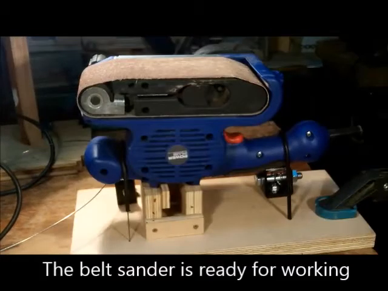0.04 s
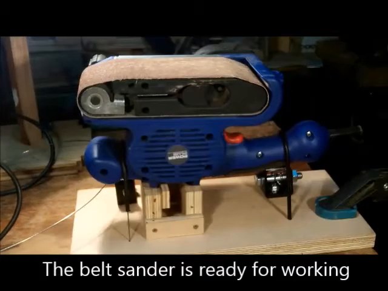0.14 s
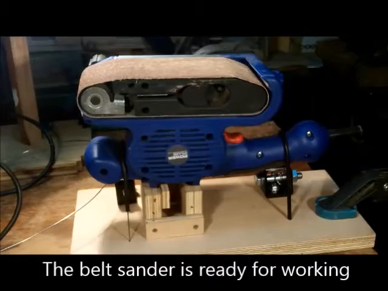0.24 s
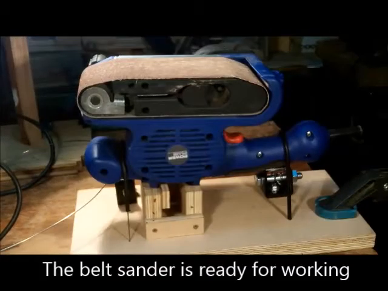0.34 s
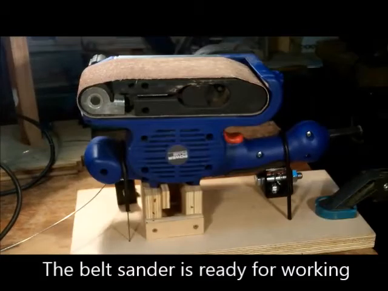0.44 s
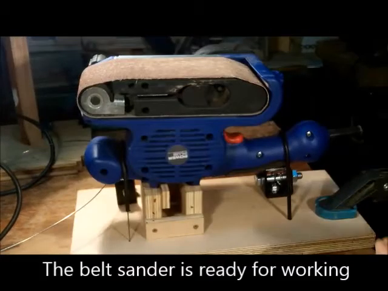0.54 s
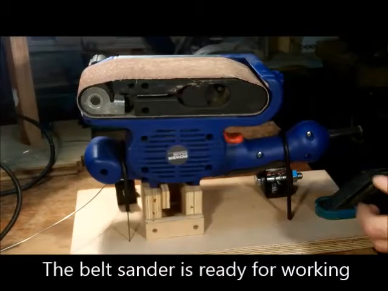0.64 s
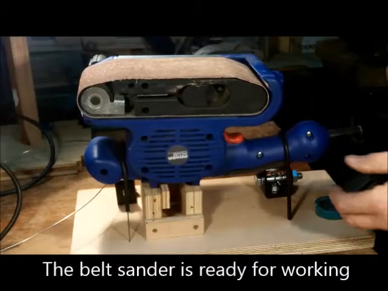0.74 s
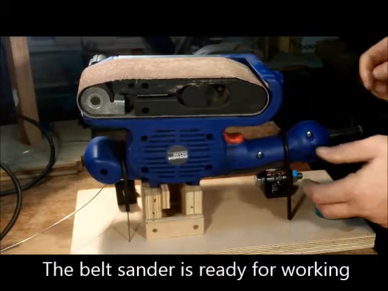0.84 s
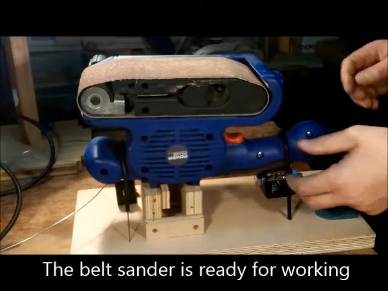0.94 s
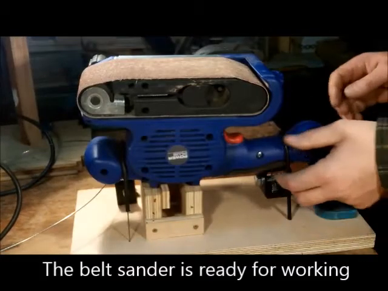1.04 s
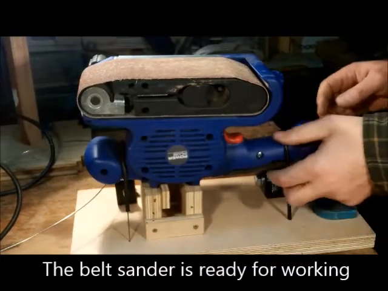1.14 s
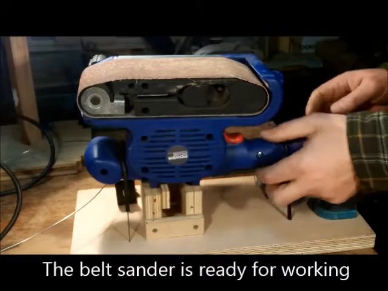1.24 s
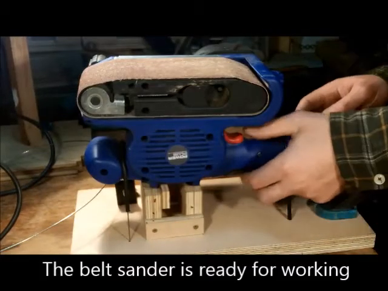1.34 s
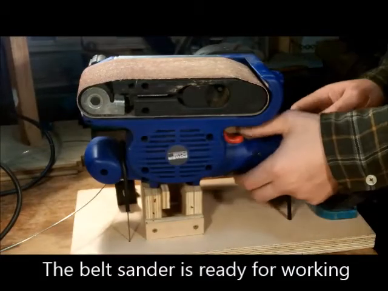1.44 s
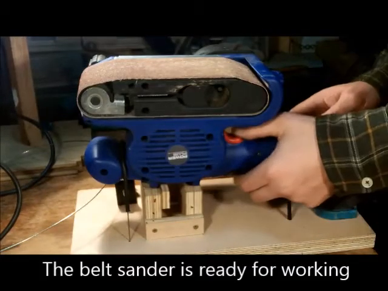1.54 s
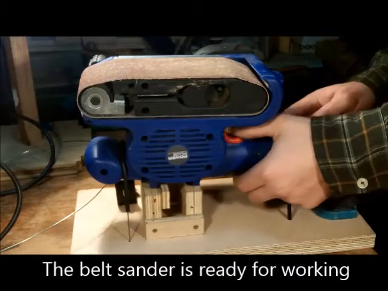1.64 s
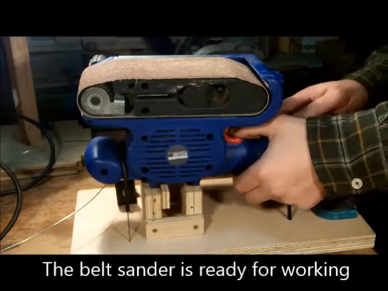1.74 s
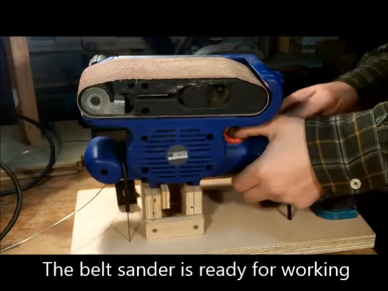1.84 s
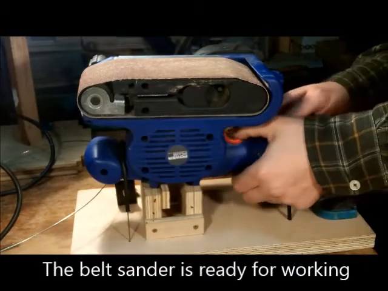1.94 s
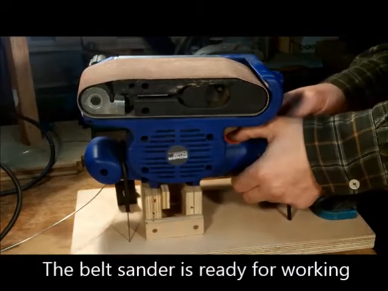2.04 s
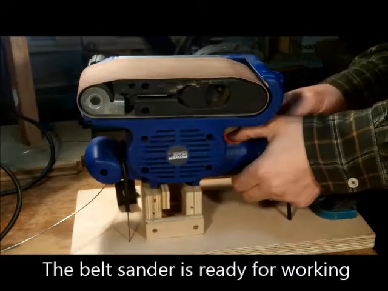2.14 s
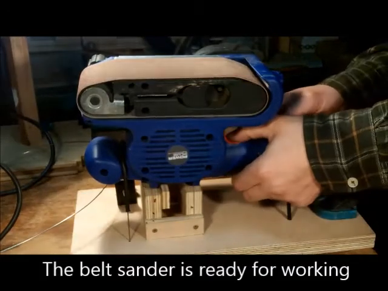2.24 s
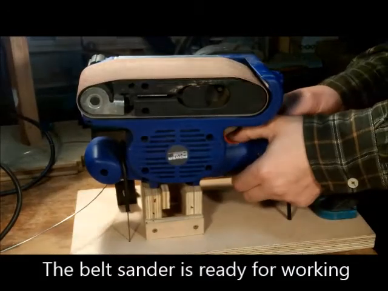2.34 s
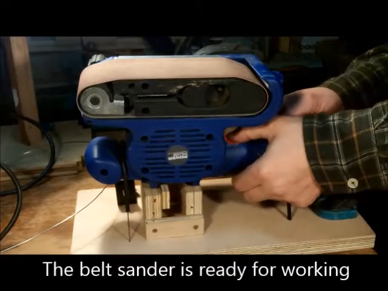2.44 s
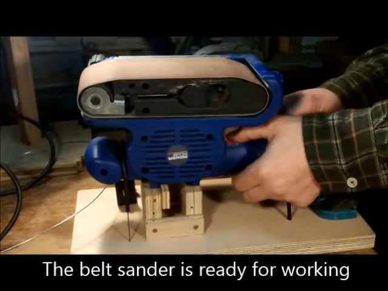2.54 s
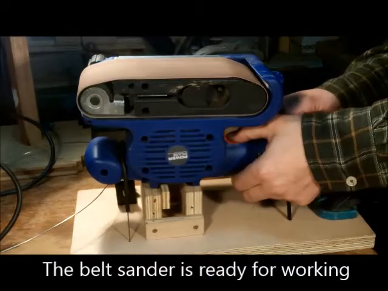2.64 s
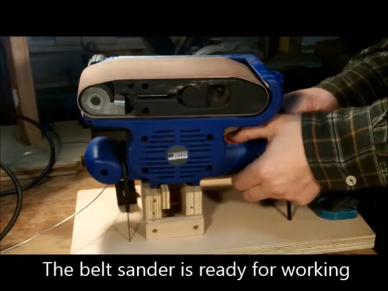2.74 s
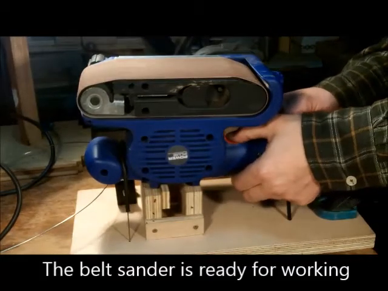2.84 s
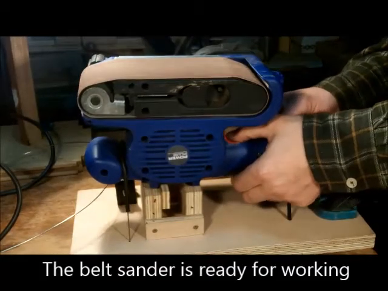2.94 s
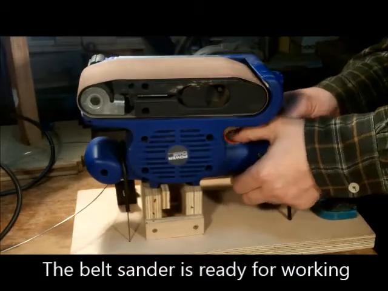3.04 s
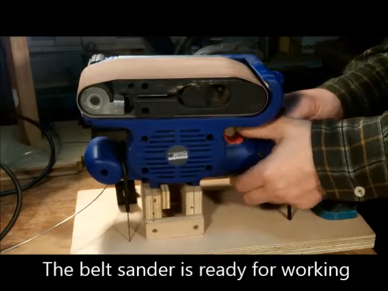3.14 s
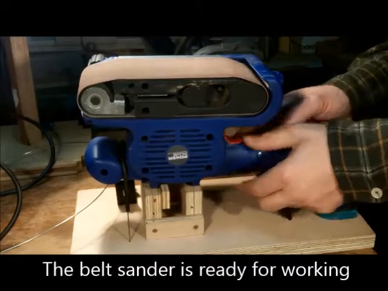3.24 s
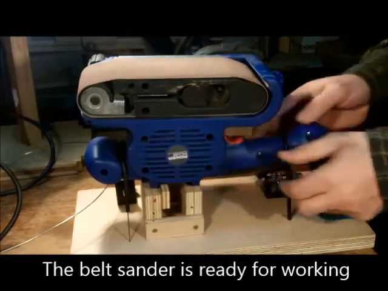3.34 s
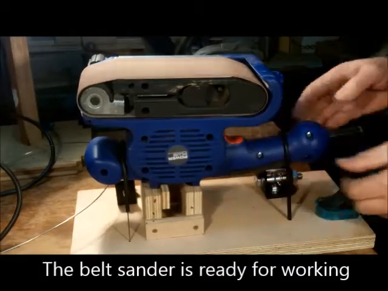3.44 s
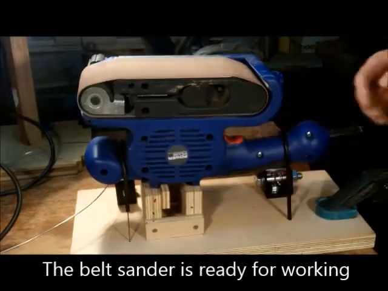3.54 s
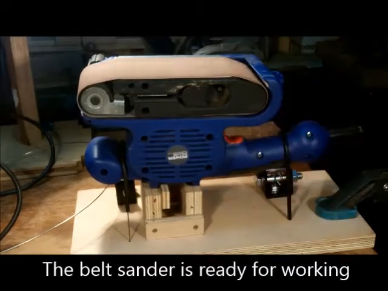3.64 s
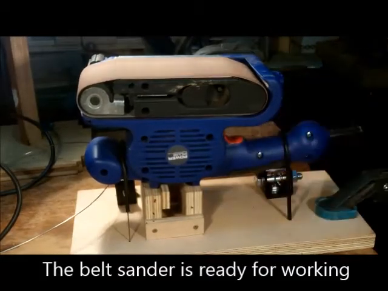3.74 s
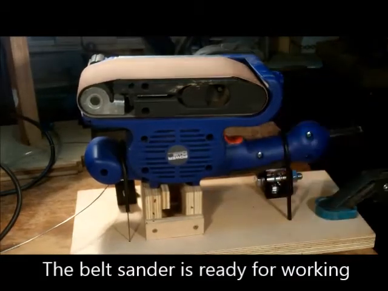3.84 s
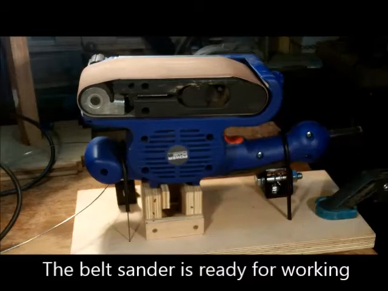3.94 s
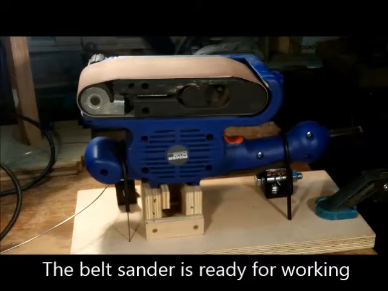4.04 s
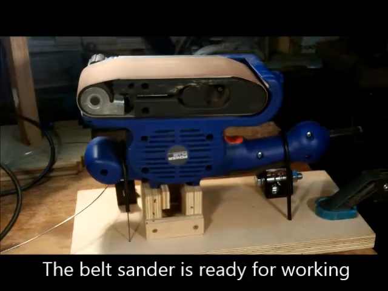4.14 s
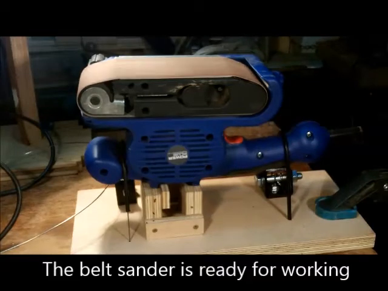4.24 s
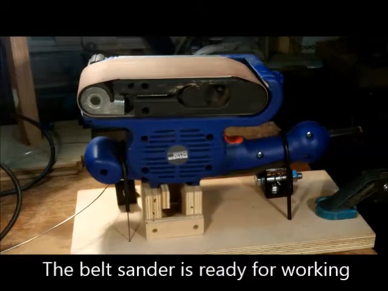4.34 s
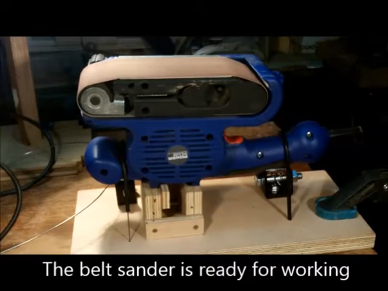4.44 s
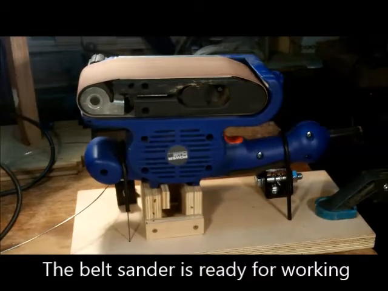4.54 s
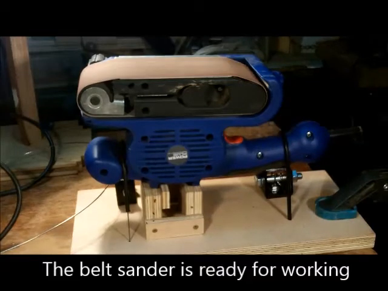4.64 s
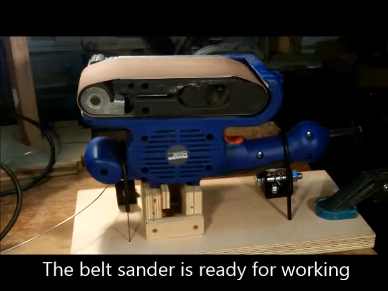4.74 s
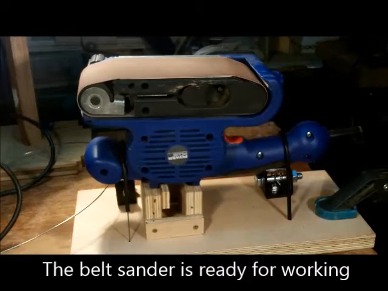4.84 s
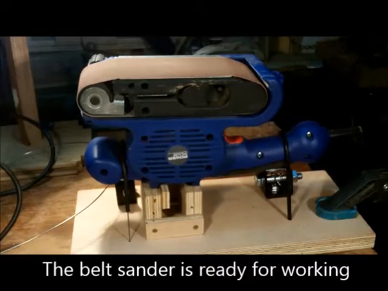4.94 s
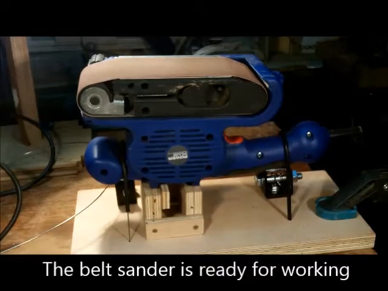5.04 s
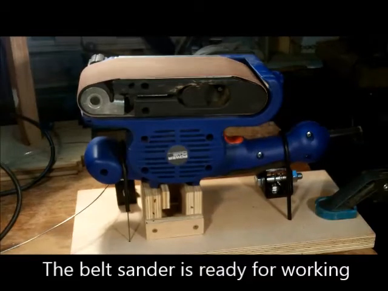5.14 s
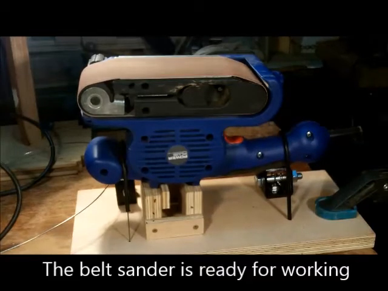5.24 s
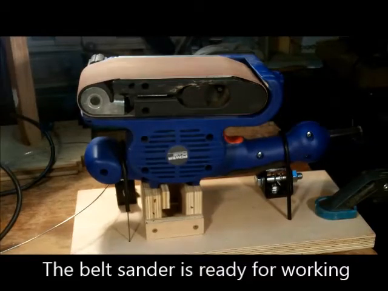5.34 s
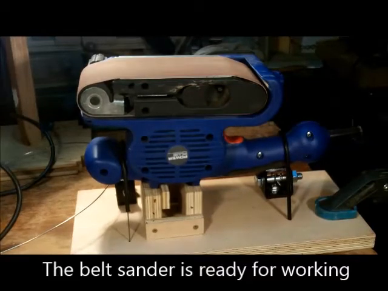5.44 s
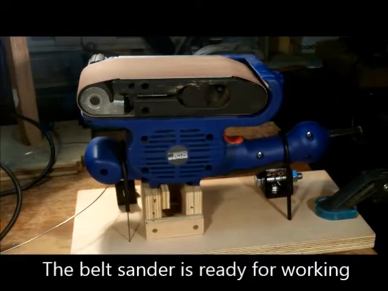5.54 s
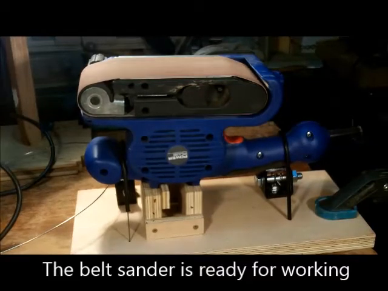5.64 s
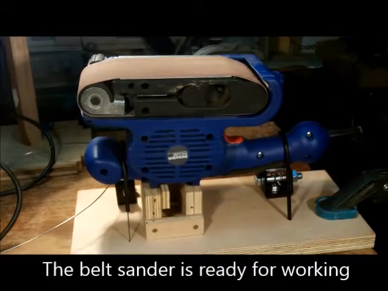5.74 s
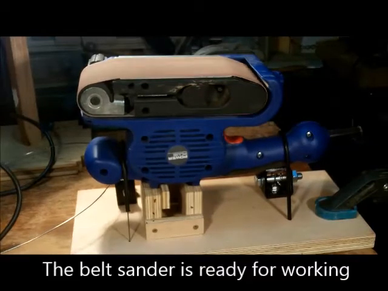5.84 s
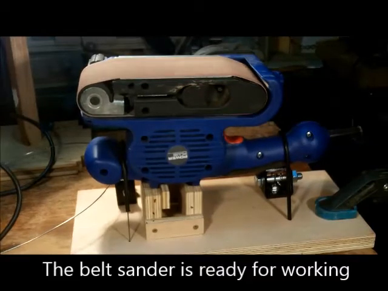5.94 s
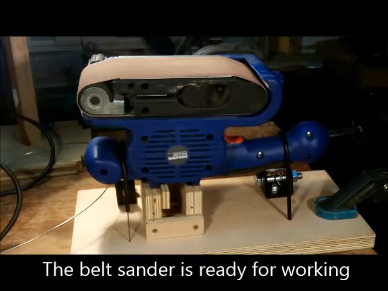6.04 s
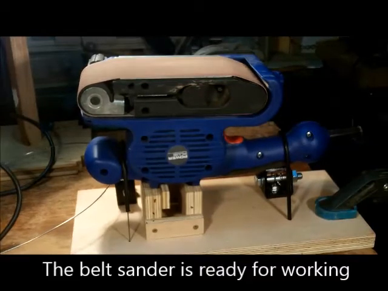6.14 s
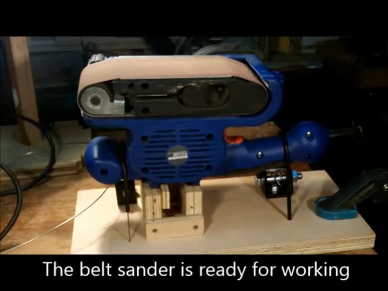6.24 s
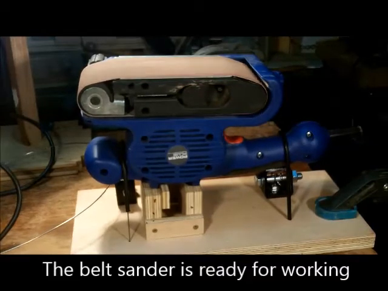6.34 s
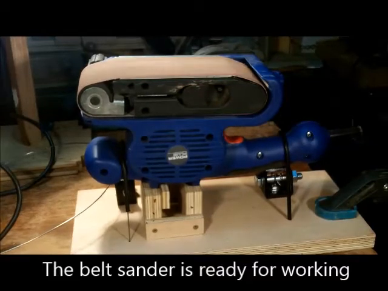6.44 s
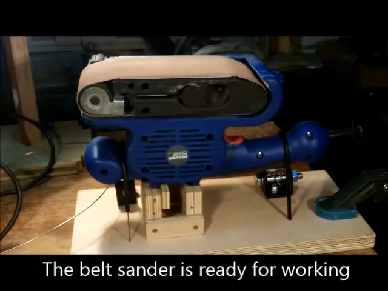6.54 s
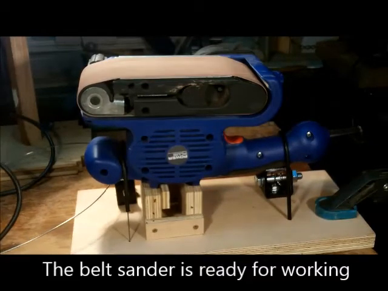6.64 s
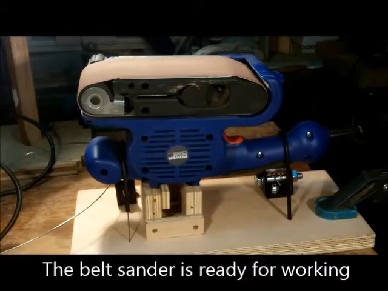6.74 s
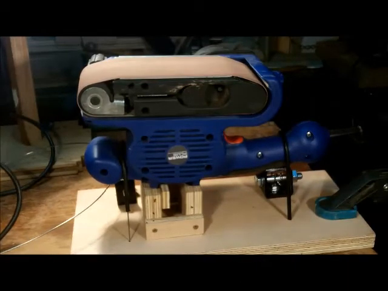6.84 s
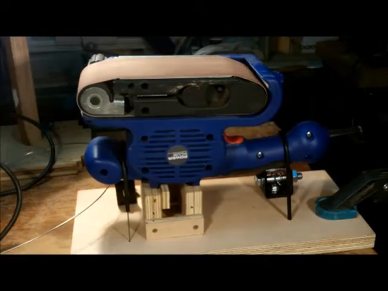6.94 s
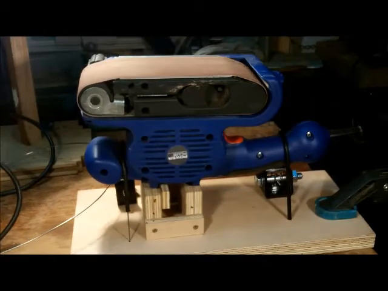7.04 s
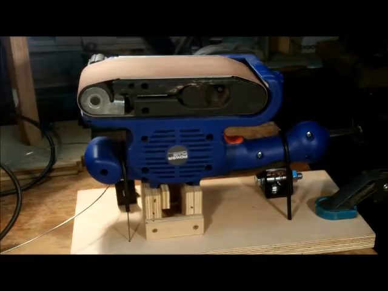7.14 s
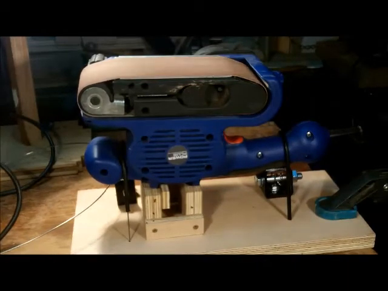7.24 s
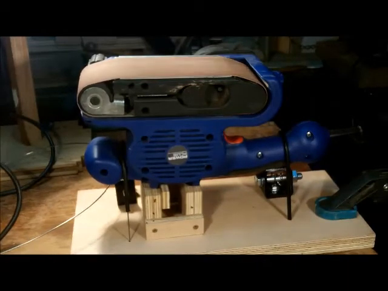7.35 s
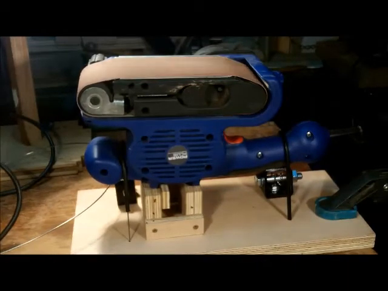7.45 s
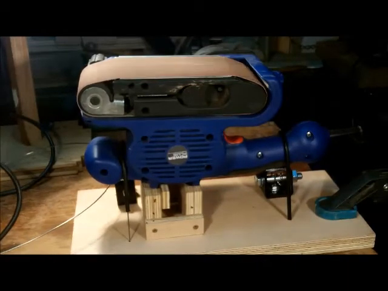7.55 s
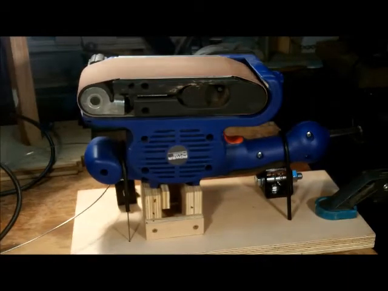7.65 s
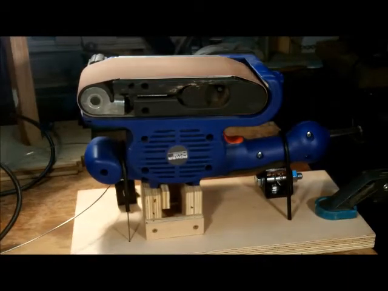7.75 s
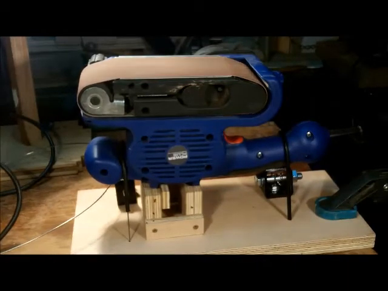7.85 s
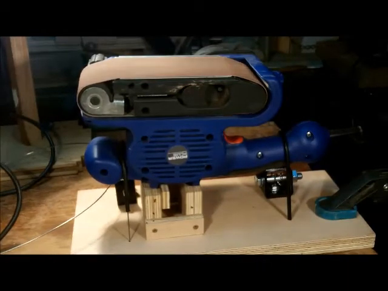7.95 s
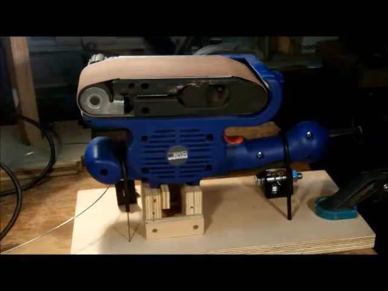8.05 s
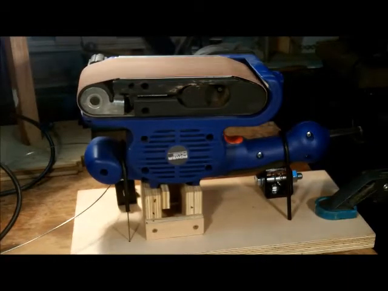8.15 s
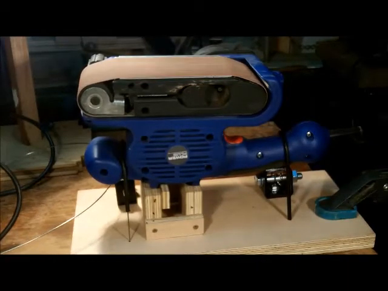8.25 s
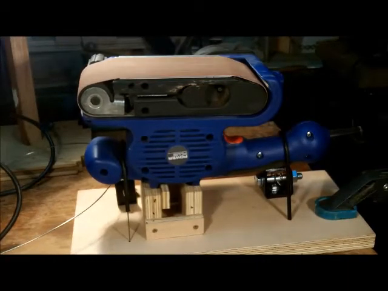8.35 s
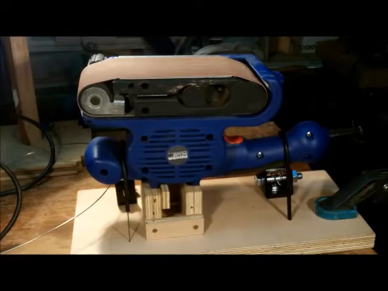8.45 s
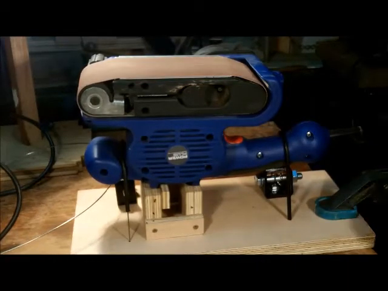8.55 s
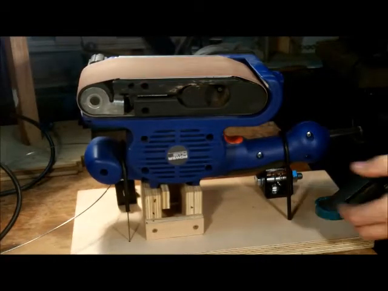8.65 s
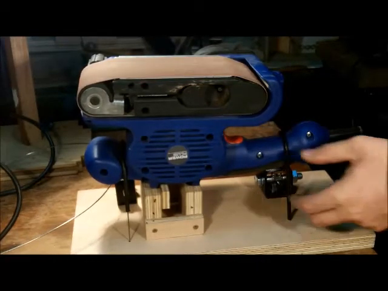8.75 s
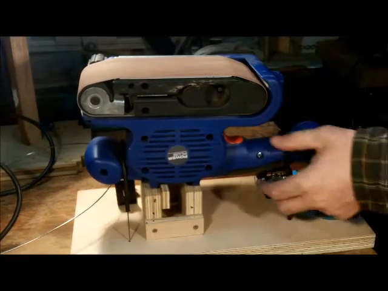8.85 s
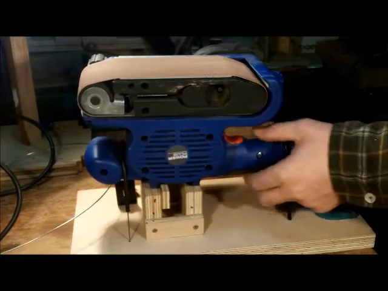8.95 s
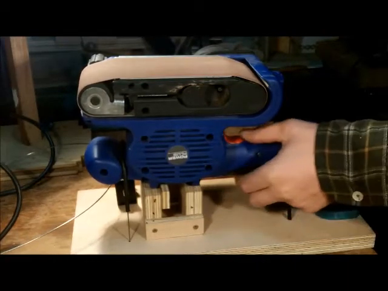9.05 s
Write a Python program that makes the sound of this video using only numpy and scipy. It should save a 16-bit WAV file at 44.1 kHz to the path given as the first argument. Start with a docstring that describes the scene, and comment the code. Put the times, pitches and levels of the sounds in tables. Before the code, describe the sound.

After two quiet seconds of hiss and faint hand brushing, a trigger ticks and a belt sander jolts, whines upward and runs at a steady roar.

```python
"""A belt sander, clamped to a wooden jig, jerks into motion, climbs to speed and runs free.
Its tones are sines that follow the turning of three shafts; its air and rattle are noise and random taps
that ring in a plastic housing, and jolts in the drive shake the jig.
Before the start, a hand slides onto the grip (bursts of filtered noise) and presses the trigger (a ringing tick).
Behind it is a quiet workshop: steady hiss, a low rumble and a thud, picked up by one small microphone."""
import sys
import numpy as np
from scipy import signal
from scipy.fft import rfft, irfft
from scipy.io import wavfile

SR = 44100
rng = np.random.default_rng(int(sys.argv[2]) if len(sys.argv) > 2 else 0)


def digitize_waveform(pressure):
    """Quantize a signal to 16-bit integers and store it at the path in sys.argv[1].

    Rows of a 2-D input are taken as channels; values are limited to [-1, 1].
    """
    field = np.atleast_2d(pressure).T
    bounded = np.clip(field, -1, 1)
    quanta = np.round(bounded * 32767).astype(np.int16)
    wavfile.write(sys.argv[1], SR, quanta)


N = 401751
TIME = np.arange(N) / SR   # s

START_S = 2.112   # the motor starts
GEAR_RATIO, DRUM_RATIO = .5457, .08805   # turns of the gear shaft and of the belt drum per rotor turn


def sander():
    """Sines follow the three shafts over air and rattle; jolts at the start shake the jig."""
    speed = rotor_speed()
    speed_share = speed / speed[-1]   # 1 = final speed
    turns = np.cumsum(speed) / SR
    age = np.maximum(TIME - START_S, 0)
    strain = np.clip(4 * (1 - speed_share) - .8, 0, 1)   # the drive shudders while it pulls away
    gear_turns = GEAR_RATIO * turns + .012 * strain * drift(60)
    fade_in = np.clip(age / 0.025, 0, 1)
    motor_tones = strong_tones(speed, turns, gear_turns, strain) + weak_tones(speed_share, turns, gear_turns)
    knocks, shoves = jolts()
    noises = air_and_rattle(turns, age) + knocks
    return fade_in * motor_tones + walls(noises) + shaken_jig(shoves)


JERK_TURNS_PER_S, GAIN_TURNS_PER_S2, EVEN_UNTIL_S = 152.5, 930, 2.21
# Running speed, creeping up as the drive loosens: (time [s], rotor speed [turns per s])
RUNNING_SPEED = [(3, 416.4), (3.9, 423.4), (4.45, 426.9), (5.2, 427.2), (7, 431.4), (8, 432.8),
                 (9.11, 432.9)]
# Two lags in reaching it: (speed still missing [turns per s], time constant [s])
SPEED_LAGS = [(42.2, .0713), (130.3, .2745)]


def rotor_speed():
    """The rotor jerks into motion, gains speed evenly, then closes in on its running speed with two lags."""
    even_gain = JERK_TURNS_PER_S + GAIN_TURNS_PER_S2 * np.maximum(TIME - START_S, 0)
    age = TIME - EVEN_UNTIL_S
    missing = sum(short * np.exp(-np.maximum(age, 0) / lag_s) for short, lag_s in SPEED_LAGS)
    closing_in = np.interp(TIME, *np.transpose(RUNNING_SPEED)) - missing
    return np.where(age < 0, even_gain, closing_in)


SLOTS, MESH_TEETH = 12, 6   # tones per turn of the rotor and of the gear shaft
# Strong tones swell as they pass resonances of the housing.
# Each table is a level against the tone's own pitch: (pitch [Hz], rms level [dB])
SLOT_WHINE = [(2300, -32.5), (2870, -23), (3200, -31), (3520, -35), (3800, -24), (4200, -23), (4900, -23.5),
              (5060, -26), (5120, -25.5), (5195, -27)]
SLOT_WHINE_OCTAVE = [(8400, -80), (9300, -58), (10000, -60), (10250, -69), (10330, -76), (10390, -65)]
ROTOR_UNBALANCE = [(190, -63), (340, -70), (388, -52), (412, -55.5), (418, -62), (424, -57), (428, -61),
                   (433, -54.5)]   # once per rotor turn
GEAR_MESH = [(600, -43), (680, -24.5), (760, -47), (850, -37), (940, -45), (1030, -35), (1170, -48),
             (1260, -42), (1370, -59), (1397, -46.5), (1417, -50)]
GEAR_MESH_OCTAVE = [(1240, -45), (1350, -39), (1560, -41), (1950, -33), (2300, -37), (2520, -43),
                    (2700, -49), (2770, -36), (2810, -37.5), (2835, -37.5)]
BELOW_GEAR_MESH = [(950, -64), (1120, -57), (1155, -49), (1168, -52), (1175, -50), (1181, -55)]   # one multiple under the mesh


def strong_tones(speed, turns, gear_turns, strain):
    """Rotor slots, unbalance and meshing teeth sound at multiples of shaft speed, less steady under strain."""
    rotor_tones = {SLOTS: SLOT_WHINE, 2 * SLOTS: SLOT_WHINE_OCTAVE, 1: ROTOR_UNBALANCE}
    gear_tones = {MESH_TEETH: GEAR_MESH, 2 * MESH_TEETH: GEAR_MESH_OCTAVE, MESH_TEETH - 1: BELOW_GEAR_MESH}
    rotor_db = [at_pitch(level, k * speed) for k, level in rotor_tones.items()]
    gear_db = [at_pitch(level, k * GEAR_RATIO * speed) for k, level in gear_tones.items()]
    shaky_turns = turns + (.002 + .006 * strain) * drift(30)
    shaky_gear = gear_turns + .004 * drift(30)
    rotor = tones(shaky_turns, rotor_tones, rotor_db, waver_db=1.1 + 2.5 * strain, rate=30)
    gear = tones(shaky_gear, gear_tones, gear_db, waver_db=2.5 + 3.5 * strain, rate=25)
    return rotor + gear


# Weak tones of each shaft: which multiples of its turning sound,
# and for each multiple, in the same order, (rms level at final speed [dB])
WEAK_ROTOR_MULTIPLES = [2, 4, 14]
WEAK_ROTOR_DB = [-62, -67, -48]
WEAK_GEAR_MULTIPLES = [1, 7, 10, 11, 14, 19, 20]
WEAK_GEAR_DB = [-67, -63, -50, -41, -51, -55, -39]
WEAK_DRUM_MULTIPLES = [1, 2, 3, 32]
WEAK_DRUM_DB = [-67, -74.5, -70.5, -51.5]


def weak_tones(speed_share, turns, gear_turns):
    """Fainter multiples of each shaft grow with speed; the gear tones firm up steeply near full speed."""
    rotor = tones(turns, WEAK_ROTOR_MULTIPLES, WEAK_ROTOR_DB, waver_db=2.0, rate=3)
    drum = tones(DRUM_RATIO * turns, WEAK_DRUM_MULTIPLES, WEAK_DRUM_DB, waver_db=2.0, rate=2.2)
    shaky_gear = gear_turns + 0.0016 * drift(30)
    gear = tones(shaky_gear, WEAK_GEAR_MULTIPLES, WEAK_GEAR_DB, waver_db=1.5, rate=4.9)
    return speed_share ** 0.69 * (rotor + drum) + speed_share ** 3.7 * gear


def tones(turns, multiples, levels_db, waver_db, rate):
    """Sines at multiples of one shaft's turning, each wavering on its own around its mean power."""
    out = 0
    for k, db in zip(multiples, levels_db):
        keep_power_db = waver_db ** 2 * np.log(10) / 20   # takes back the power that wavering adds
        gain = from_db(db + waver_db * drift(rate) - keep_power_db)
        out = out + np.sqrt(2) * gain * np.sin(2 * np.pi * (k * turns + rng.random()))
    return out


def at_pitch(points, hz):
    """Level of a tone at its present pitch, read from a table."""
    return np.interp(hz, *np.transpose(points))


ROAR_DB, ROAR_RISE_S = -24.5, 0.0066   # rms level once the extra pull has gone
PULL_DB, PULL_S = 4, 0.12   # extra level as the motor pulls away, and its time constant
# Tone colour given by the plastic housing: (pitch [Hz], relative level per Hz [dB])
HOUSING = [(90, -39), (150, -32.5), (360, -29.5), (960, -19.5), (2770, -3.5), (3230, -8), (4400, 0.5),
           (5300, -5.5), (7300, -19), (8300, -44), (10200, -44), (11600, -38), (14000, -33.5), (15200, -78)]
# Resonances of the air spaces inside: (pitch [Hz], width [Hz], boost [dB])
CAVITIES = [(588, 133, 5), (1105, 89, 3.5), (2740, 800, 3), (3524, 190, 4), (827, 43, 0), (2300, 43, 0.5),
            (4250, 880, 4), (9300, 1430, 19), (11320, 1430, 13.5)]


def air_and_rattle(turns, age):
    """Cooling air (noise) and gear rattle (random taps) swell with the shafts and ring in the housing."""
    def turning(ratio):
        return np.cos(2 * np.pi * ratio * turns)

    swell_db = 1.2 * turning(GEAR_RATIO) + 0.5 * turning(DRUM_RATIO)
    swell_db += 1.24 * turning(GEAR_RATIO - DRUM_RATIO) + 0.46 * turning(2 * DRUM_RATIO)
    swell_db += 0.32 * drift(4.2) + .5 * drift(44)
    sizes = from_db(3.4 * np.minimum(rng.exponential(1, N), 3)) * rng.choice([-1, 1], N)
    taps = sizes * (rng.random(N) < 900 / SR)   # about 900 a second
    dull = signal.butter(2, 5000, fs=SR, output="sos")   # plastic taps are dull
    rattle = 0.77 * signal.sosfilt(dull, rms_one(taps))
    air = rng.standard_normal(N)
    drive = rms_one(from_db(swell_db) * (air + rattle))
    level_db = ROAR_DB + PULL_DB * np.exp(-age / PULL_S)
    fade_in = np.clip(age / ROAR_RISE_S, 0, 1)
    return colour(fade_in * from_db(level_db) * drive, HOUSING, CAVITIES)


JOLT_RISE_S = .0006
# The drive takes up its slack in jolts:
# (time [s], noise level before rise and fading [dB], time to fade by 60 dB [s], shove on the jig [dB])
JOLTS = [(2.1135, -25, .05, -34), (2.1182, 1, .006, -27), (2.1212, -8, .007, -32), (2.129, -17, .03, -22),
         (2.135, -13, .03, -23), (2.143, -15, .04, -29), (2.159, -18, .025, -33)]
# Tone colour of the jolts: (pitch [Hz], relative level per Hz [dB])
CRUNCH = [(100, -35), (500, -14.5), (1200, -14.5), (2300, -5.5), (3000, -5), (3700, -2), (4500, -5),
          (5500, -13), (7500, -26), (9000, -58), (15200, -55)]
# Resonances in that colour: (pitch [Hz], width [Hz], boost [dB])
CRUNCH_RINGS = [(2440, 400, 7), (3620, 200, 6), (3960, 250, 6), (4600, 250, 4)]


def jolts():
    """Parts knock together in short dying bursts of noise, and each one also shoves the jig."""
    envelope, shoves = np.zeros(N), np.zeros(N)
    for s, db, ring_s, shove_db in JOLTS:
        age = np.clip(TIME - s, 0, 1)
        rise = np.minimum(age / JOLT_RISE_S, 1)
        envelope += from_db(db - 60 * age / ring_s) * rise * (age < 1)
        shoves[round(s * SR)] = from_db(shove_db)
    return colour(envelope * rng.standard_normal(N), CRUNCH, CRUNCH_RINGS), shoves


# Ways in which the wooden jig can ring: (pitch [Hz], level [dB], time to fade by 60 dB [s])
JIG_MODES = [(99, -8.5, 0.2), (150, -23, 0.22), (220, -22, .15), (395, -24, 0.1), (608, -5, 0.21),
             (802, -6, .08), (954, -7, .06), (1234, -9, .06)]


def shaken_jig(shoves):
    """Each shove sets all the modes of the jig ringing, and they die away."""
    return sum(from_db(db) * ring(shoves, hz, t60) for hz, db, t60 in JIG_MODES)


# Hands and sleeves brushing:
# (time [s], level before wavering [dB], rise [s], fall [s], lowest pitch [Hz], highest pitch [Hz])
BRUSHES = [(0, -36, 0.0018, 0.032, 2550, 5800), (0.431, -52, .01, 0.072, 2200, 4900),
           (0.767, -56.5, .01, .05, 250, 890), (0.76, -58, .01, 0.12, 2000, 5940),
           (1.065, -55, .012, .045, 250, 750), (1.074, -56, .01, 0.068, 2500, 4000),
           (1.189, -51.5, .02, 0.078, 700, 3020), (1.402, -55, 0.025, 0.1, 1500, 5000),
           (1.595, -47.5, .003, .1, 2000, 5900), (1.597, -43, 0.043, 0.15, 1500, 5300),
           (1.603, -48, 0.043, 0.13, 686, 1500), (1.88, -56, 0.048, .04, 1500, 5000),
           (1.978, -50, .005, .08, 580, 1290)]


def brushing_hands():
    """Skin and cloth brush the grip and bench: strokes of noise, each in its own pitch band."""
    out = np.zeros(N)
    for s, db, rise, fall, low_hz, high_hz in BRUSHES:
        band = signal.butter(3, [low_hz, high_hz], "band", fs=SR, output="sos")
        noise = rms_one(signal.sosfilt(band, rng.standard_normal(N)))
        stroke = np.interp(TIME, [s, s + rise, s + rise + fall], [0, 1, 0])
        out += from_db(db + 2.1 * drift(90)) * stroke * noise
    return out


TRIGGER_S, TRIGGER_DB = 1.978, -33   # height of the click before it is softened
REBOUND_S, REBOUND_DB = .01, -11   # second click: delay, and level against the first
# Ringing of the trigger: (pitch [Hz], level [dB], time to fade by 60 dB [s])
TRIGGER_MODES = [(200, -24, 0.03), (597, -4, 0.025), (1010, -4, .025), (1850, -5, .02), (2800, -1, .01),
                 (4700, -3, .008)]


def trigger():
    """The trigger ticks under the finger and rebounds; each softened click sets small modes ringing."""
    clicks = np.zeros(N)
    clicks[round(TRIGGER_S * SR)] = from_db(TRIGGER_DB)
    clicks[round((TRIGGER_S + REBOUND_S) * SR)] = from_db(TRIGGER_DB + REBOUND_DB)
    soft = signal.butter(2, 3500, fs=SR, output="sos")   # a soft plastic contact
    tick = signal.sosfilt(soft, clicks)
    out = np.zeros(N)
    for k, (hz, db, t60) in enumerate(TRIGGER_MODES):
        out += (-1) ** k * from_db(db) * ring(tick, hz, t60)   # every other mode is upside down
    return out


ECHO_DB, ECHO_T60_S = -11.5, 0.13   # echo level against the direct sound; time to fade by 60 dB


def walls(x):
    """Bench and walls return a scatter of echoes that dies away."""
    age = TIME[:SR // 3]
    scatter = rng.standard_normal(len(age)) * (rng.random(len(age)) < .05)   # one sample in 20
    echoes = scatter * from_db(-60 * age / ECHO_T60_S) * (age > .003)
    echoes = echoes / np.sqrt(np.sum(echoes ** 2))
    return x + from_db(ECHO_DB) * signal.fftconvolve(x, echoes)[:N]


ROOM_DB = -54.5   # rms level of the steady hiss
# Tone colour of the room air and microphone hiss: (pitch [Hz], relative level per Hz [dB])
ROOM = [(35, -10), (60, -1), (219, -0.5), (318, -1), (505, -1), (567, -2.5), (1980, -6.5), (4880, -8.5),
        (6740, -14), (7750, -29), (9540, -15), (13200, -14), (15200, -11)]
THUD_DB, THUD_HZ, THUD_T60_S = -39, 41, 0.43   # starting height, pitch, time to fade by 60 dB
RUMBLE_DB, RUMBLE_RUNNING_DB = -67, -79   # before and after the motor starts, without swells and wavering
# Swells of the rumble: (time of the top [s], half length [s], rise [dB])
SWELLS = [(0, .3, 6), (1.6, 0.36, 5)]


def workshop():
    """Steady air and microphone hiss, a low rumble of filtered noise, and a thud dying away at first."""
    hiss = from_db(ROOM_DB + 0.18 * drift(3.4)) * colour(rng.standard_normal(N), ROOM)
    thud = from_db(THUD_DB - 60 * TIME / THUD_T60_S) * np.sin(2 * np.pi * THUD_HZ * TIME)
    bass_band = signal.butter(2, [15, 60], "band", fs=SR, output="sos")
    low_noise = rms_one(signal.sosfilt(bass_band, rng.standard_normal(N)))
    swell_db = sum(db * np.clip(1 - np.abs(TIME - s) / half, 0, 1) for s, half, db in SWELLS)
    rumble_db = np.where(TIME < START_S, RUMBLE_DB, RUMBLE_RUNNING_DB) + swell_db + 3.7 * drift(6)
    return hiss + thud + from_db(rumble_db) * low_noise


def from_db(db):
    """Decibels to gain."""
    return 10 ** (np.asarray(db) / 20)


def rms_one(x):
    """Scale to unit rms."""
    return x / np.sqrt(np.mean(x ** 2) + 1e-20)


def drift(rate):
    """Slow random wander of rms 1: noise smoothed twice at the given rate [Hz]."""
    step = 40   # samples between the points of the slow signal
    r = np.exp(-2 * np.pi * rate * step / SR)
    noise = rng.standard_normal(N // step + 4002)
    slow = signal.lfilter([1], [1, -2 * r, r * r], noise)[4000:]   # skip the settling
    return np.interp(np.arange(N) / step, np.arange(len(slow)), rms_one(slow))


def ring(clicks, hz, t60):
    """A unit click sets a dying sine of starting height 1 ringing; it fades by 60 dB in t60 seconds."""
    r, w = from_db(-60 / (t60 * SR)), 2 * np.pi * hz / SR
    return signal.lfilter([0, np.sin(w)], [1, -2 * r * np.cos(w), r * r], clicks + 1e-18)


def colour(x, spectrum, peaks=()):
    """Causal filter with the given spectrum and resonances; white noise of rms 1 keeps rms 1."""
    hz = np.maximum(np.fft.rfftfreq(8192, 1 / SR), 1)
    spectrum_hz, spectrum_db = np.transpose(spectrum)
    db = np.interp(np.log(hz), np.log(spectrum_hz), spectrum_db)
    for top_hz, width, peak_db in peaks:
        db = db + peak_db / (1 + (2 * (hz - top_hz) / width) ** 2)
    cepstrum = irfft(np.log(from_db(db)))
    cepstrum[1:4096] *= 2   # folding the cepstrum gives the minimum phase
    cepstrum[4097:] = 0
    response = irfft(np.exp(rfft(cepstrum)))
    return signal.fftconvolve(x, response / np.sqrt(np.sum(response ** 2)))[:N]


def scene():
    """One microphone feeds both channels."""
    hands = brushing_hands() + trigger()
    return np.tile(sander() + walls(hands) + workshop(), (2, 1))


# Edges of the missing band: (lower edge [Hz], upper edge [Hz])
GAP_EDGES = [7800, 8080]


def record(dry):
    """The microphone drops the deepest bass, a narrow band near 8 kHz is missing, and the top is cut."""
    bass = signal.butter(2, 22, "high", fs=SR, output="sos")
    gap = signal.cheby2(6, 60, GAP_EDGES, "bandstop", fs=SR, output="sos")
    top = signal.cheby2(20, 80, 15310, fs=SR, output="sos")   # 80 dB down from 15310 Hz upward
    return signal.sosfilt(np.vstack([bass, gap, top]), dry)


dry = scene()
out = record(dry)
digitize_waveform(out)
```